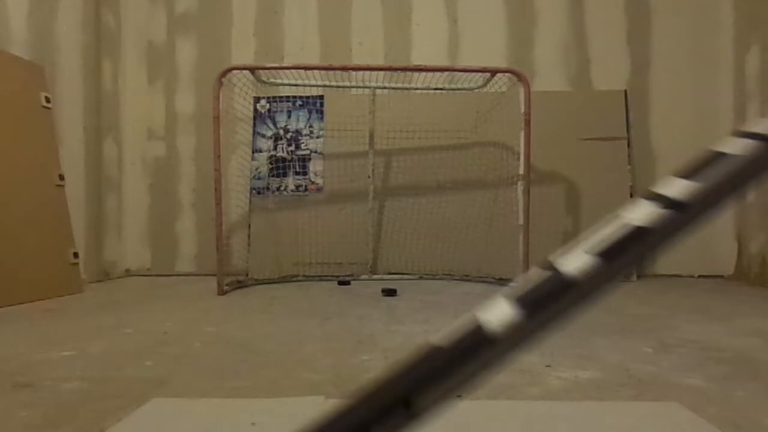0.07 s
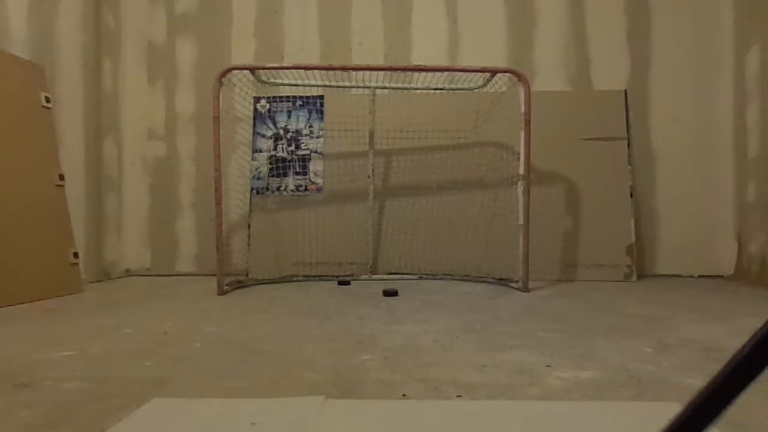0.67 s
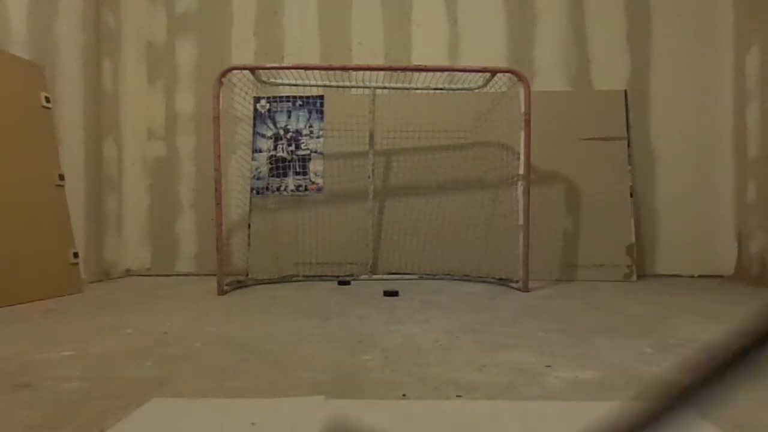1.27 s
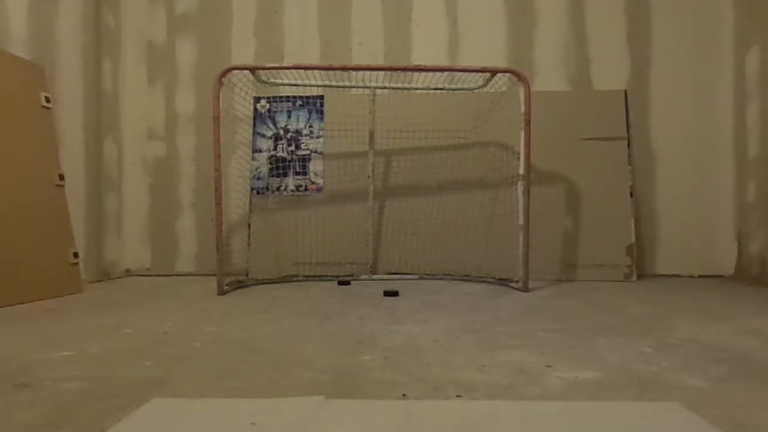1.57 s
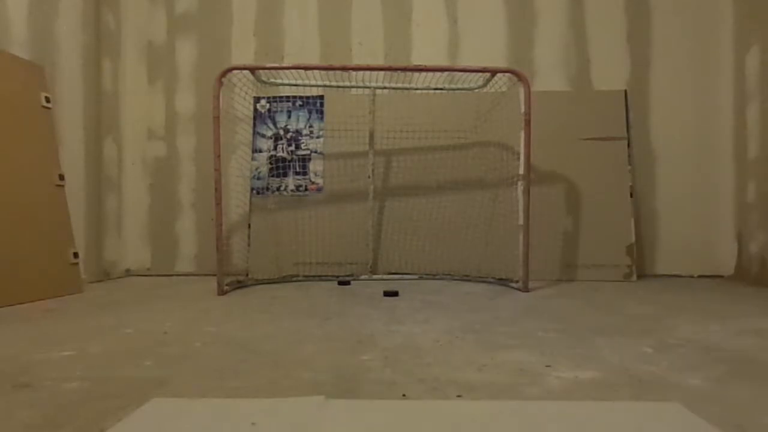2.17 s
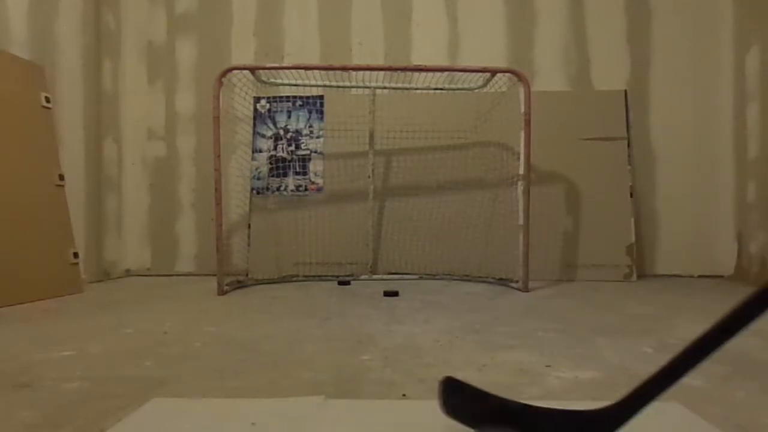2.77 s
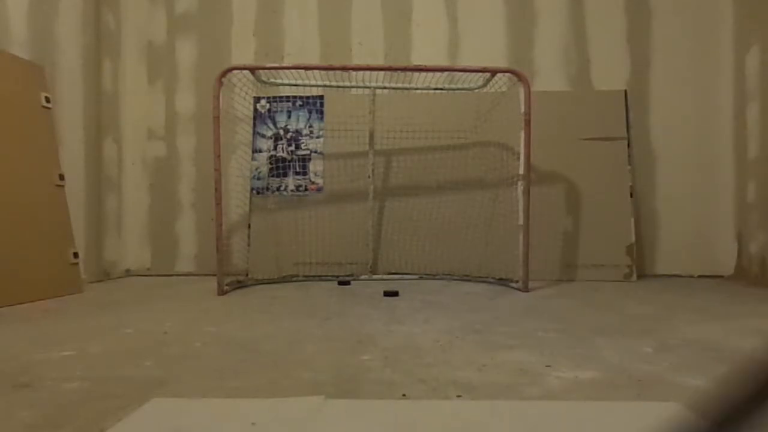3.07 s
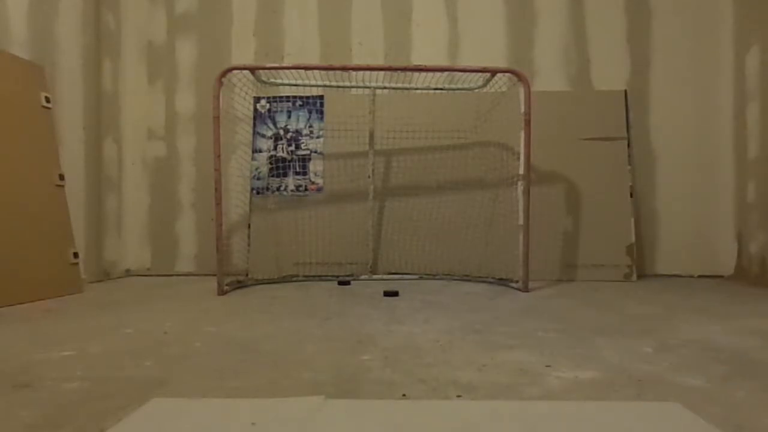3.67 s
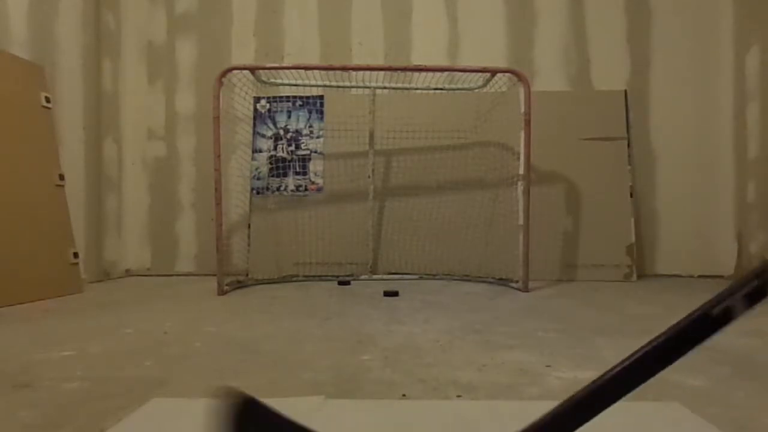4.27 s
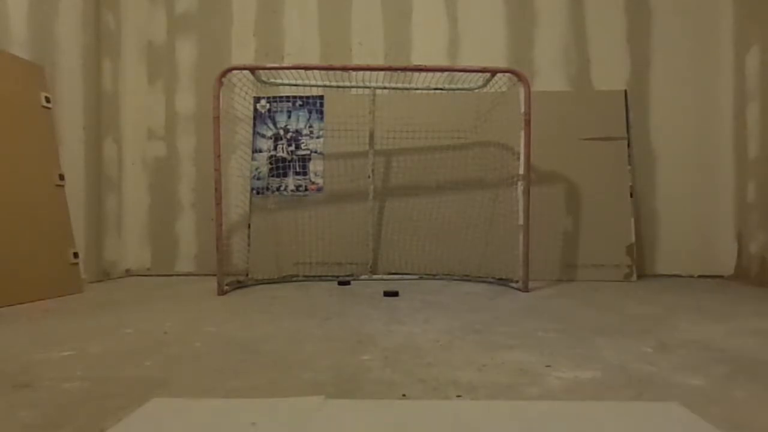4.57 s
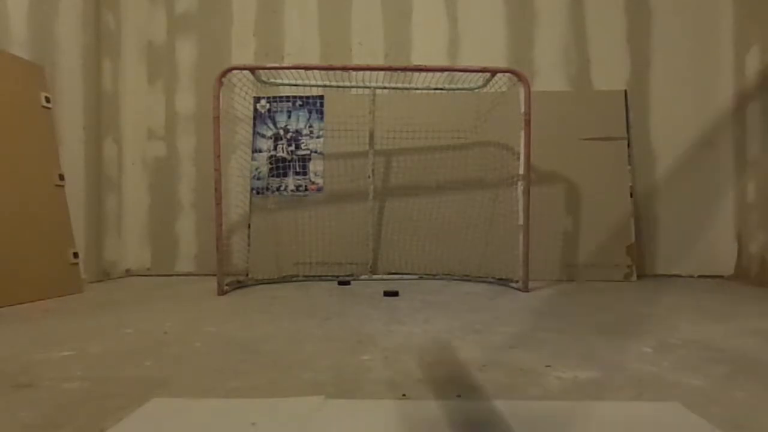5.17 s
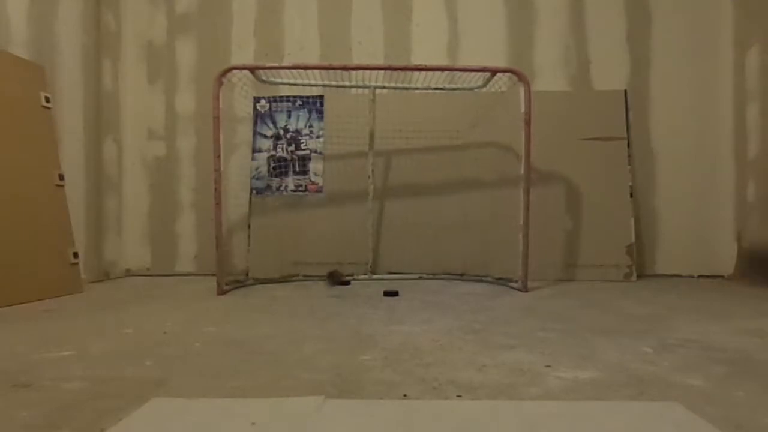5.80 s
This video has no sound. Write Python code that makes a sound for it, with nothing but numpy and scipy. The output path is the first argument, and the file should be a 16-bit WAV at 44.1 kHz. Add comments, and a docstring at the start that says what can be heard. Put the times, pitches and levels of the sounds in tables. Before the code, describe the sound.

A hockey stick handles a puck on a plastic pad close to the microphone, in a bare basement with a low, steady hush and a short, hard echo. A brief grainy rasp at 0.2 seconds leads to a loud knock at 0.4. From 1 to 4.6 seconds the blade clacks the puck to and fro in uneven knocks, often in quick pairs, with soft sliding between them. Two very loud knocks, at 2.8 and 4.1 seconds, overload the microphone with a short bass thump.

After a brief pause, a wrist shot sweeps off the pad at about 5.1 seconds with a scrape and a tight cluster of cracks. At 5.5, across the room, the net swishes, the puck hits a poster hanging in it with loud, bright slaps, and the steel frame rings briefly. Around 5.75 the puck thuds onto the concrete as the net rustles out.

```python
"""Stickhandling in a hushed, bare basement. A hockey blade slides over a plastic shooting pad, drags the
puck into place with a rasp and knocks it to and fro; hard walls answer every knock, and two very loud
ones overload the microphone with a short bass thump. Then a wrist shot sweeps off the pad. The goal
net swishes as it stretches, the puck slaps a poster hung in it and the jerk rings the steel frame.
Last, the puck thuds onto the concrete while the net sways and rustles out."""
import sys
import numpy as np
from scipy import signal
from scipy.fft import rfft, irfft, next_fast_len
from scipy.io import wavfile

SR = 44100
rng = np.random.default_rng(int(sys.argv[2]) if len(sys.argv) > 2 else 0)


def inscribe(sig):
    """Save sig as 16-bit PCM at rate SR to the path in sys.argv[1].

    A 1-D sig is mono; a 2-D sig holds one channel per row.
    Samples are clipped to [-1, 1] before scaling.
    """
    pcm = np.round(np.clip(np.atleast_2d(sig).T, -1, 1) * 32767)
    wavfile.write(sys.argv[1], SR, pcm.astype(np.int16))


N = 261954
TIME = np.arange(N) / SR

# rubbing gestures: (up to speed [s], slows down [s], level [dB])
SLIDE_STROKES = [(.08, .1, -44.5), (.16, .55, -41.5), (.62, .76, -47.5), (.8, .82, -46), (1.08, 1.16, -41),
                 (1.24, 1.36, -46.5), (1.52, 1.97, -41.5), (2.19, 2.33, -43), (2.48, 2.56, -39),
                 (2.62, 2.78, -42.5), (2.9, 3.21, -43), (3.765, 4.33, -40.5), (4.38, 4.57, -46)]  # blade and puck travel over the pad
RASP_STROKES = [(.185, .25, -32.5)]
SHOT_STROKES = [(5.03, 5.09, -28), (5.115, 5.22, -25.5)]
NET_SWAYS = [(5.58, 5.66, -29.5), (5.745, 5.76, -29), (5.86, 5.88, -37.5)]

# hits: (time [s], strength [dB], extra body [dB], extra crack [dB], ring of the struck spot [Hz],
# that ring's boost [dB], direct sound aimed at the microphone [dB])
BLADE_HITS = [(0.4458, 30, -6, -9, 1320, 0, 2), (0.9865, 19, 6, 2, 1240, 2.5, -0.5),
              (1.0373, 23.5, 3, -16.5, 820, 5, 2.5), (1.3255, 9, 9, -1, 605, 7, -1.5),
              (1.5224, 18, 2, -13.5, 690, 4, 3), (1.804, 21, -10, -4.5, 1105, 5, -0.5),
              (1.843, 26.5, -2, -14.5, 826, 5.5, 2), (2.038, 9, 5, 10.5, 2630, 4, 1.5),
              (2.0975, 3.5, 1.5, 10.5, 3550, 12, 7), (2.185, 11, 3, 8.5, 2130, 2.5, 0),
              (2.345, 4.5, 10.5, -4.5, 700, 7, 3), (2.701, 10.5, 7, 9, 4800, 3.5, 1.5),
              (2.779, 33, -8.5, -9, 1160, 5, 1.5), (3.028, 6.5, 7, 12, 4300, 1.5, 0.5),
              (3.101, 5, -7, 7.5, 2280, 6.5, 3.5), (3.136, 11, 6, 0, 1270, 4.5, 2),
              (3.862, -18.5, -2, 18, 2100, 15, 7.5), (3.955, 19, -2.5, -5.5, 4400, 10.5, 5),
              (4.083, 28, -3, -11.5, 665, 5.5, 1), (4.292, 3, 4, 5, 2560, 6.5, 4),
              (4.341, 2, 6.5, 9.5, 1950, 5.5, 0), (4.594, 5, 6.5, -16, 1265, 1.5, 6),
              (5.104, 13, 2, 8.5, 1560, 5, -1.5), (5.1205, 19.5, 8.5, 7, 610, 10.5, 1.5),
              (5.1245, 22, -34, -11, 655, 8, -3), (5.135, 14, 8, 9.5, 660, 14, -1.5),
              (5.1585, -4.5, 3, 29.5, 4360, 2.5, 5.5)]
POSTER_HITS = [(5.479, 26.2, 3.5, -8.8, 1210, 5.4, 3.3), (5.489, 21.7, -4, 2.4, 2650, 13.7, 3.9),
               (5.523, 13, -5, 0, 2650, 7.3, 4.8), (5.561, 17.3, -12, -1, 2650, 6.8, 5)]
FLOOR_HITS = [(5.747, 18.2, 3.5, 9.5, 392, 4.4, 0), (5.7605, 18.3, 5, -13, 520, 10.7, 1.8),
              (5.771, 21, -2.5, -5, 550, 8.2, 0), (5.786, 19.8, -13, 2, 520, 5.1, 2)]
# bass thumps as two very loud knocks overload the microphone: (time [s], peak [dB])
OVERLOAD_THUMPS = [(2.778, -28.5), (4.084, -29)]

# tone of each layer: (frequency [Hz], level [dB])
HUSH_EQ = [(20, -34), (50, -16.5), (110, -9), (260, -13.5), (460, -12.5), (1600, -17.5), (2300, -16),
           (3000, -26), (8500, -30.5), (15000, -27)]
SLIDE_EQ = [(59, -45), (100, -14), (146, -16.5), (324, -6.5), (416, -13), (607, -5.5), (780, -11),
            (1920, -1), (2130, -2.5), (4730, -3), (13500, -18), (15000, -27)]
RASP_EQ = [(60, -53), (400, -23), (950, -12.5), (1200, -5), (1600, -20), (2120, -8), (2700, -19),
           (8000, -33)]
KNOCK_EQ = [(55, -38.5), (130, -23.5), (270, -11), (780, -1), (1700, -3.5), (4100, -10.5), (10000, -25),
            (15000, -36.5)]
SHOT_EQ = [(59, -77), (100, -34), (196, -22), (558, -6), (633, -5.5), (923, -10), (1240, -2), (1320, -1),
           (4260, -8.5), (15000, -24)]
POSTER_EQ = [(29, -41), (50, -24), (181, -16.5), (220, -11.5), (354, -7), (506, -9.5), (816, -8),
             (1310, -2.5), (2070, -10), (2570, -10), (3180, -9), (13000, -24), (15000, -38)]
MESH_EQ = [(3000, -29), (6000, -11), (9000, -4), (12500, 1), (15000, -6.5)]
SLAP_EQ = [(55, -26), (270, -14.5), (780, -1), (1700, -0.5), (4100, -2.5), (10000, -20.5), (15000, -24)]
DROP_EQ = [(55, -21.5), (270, -2), (780, 0.5), (1700, -5.5), (4100, -21.5), (10000, -38), (15000, -46)]

# resonances of the blade: (frequency [Hz], width [Hz], boost [dB])
BLADE_PEAKS = [(867, 194, 0.5), (1320, 93, 4), (2650, 35, 3)]
# things that ring on after a blow: (frequency [Hz], level [dB], t60 [s])
PANEL_MODES = [(229, -63, 0.98), (461, -52, 0.91), (520, -47, 0.46), (609.3, -53.5, 0.74), (655, -53, 0.52),
               (842, -43, 0.18), (907, -51, 0.82), (1030, -58, 0.5), (1160, -54.5, 0.98)]  # boards and panels in the room
FRAME_MODES = [(1305, -26, 0.79), (1720, -40, 0.52), (2670, -30, 0.33)]  # steel goal frame

# early reflections off floor and walls: (delay [s], gain [linear])
REFLECTIONS = [(.0016, .16), (.0047, .56), (.0062, -.2), (.0212, .22), (.0255, .38), (.032, .22)]
# tone of the reverb tail: (frequency [Hz], level [dB])
REVERB_EQ = [(60, 9), (130, 6.5), (250, 4.5), (600, 5), (1200, 5), (2500, 6.5), (5000, 4.5), (12000, 3)]
# length of the reverb tail: (frequency [Hz], t60 [s])
REVERB_T60 = [(100, 0.64), (500, 0.64), (1200, 0.74), (3000, 0.6), (6000, 0.53), (13000, 0.31)]
# stereo width: (frequency [Hz], side against mid [dB])
SIDE_EQ = [(40, -19), (130, -25), (500, -39.5), (1000, -41.5), (2000, -41), (4000, -38), (9000, -28)]

BODY_HZ, MIDDLE_HZ, CRACK_HZ = 270, 842, 6000  # a hit's extra body fades out, then extra crack fades in
TOUCH_S, JERK_S = 5.378, 5.487  # the puck meets the net; the net jerks taut


def from_db(db):
    """Decibels to gain."""
    return 10 ** (np.asarray(db) / 20)


def rms_one(x):
    """Scale to unit power."""
    return x / np.sqrt(np.mean(x ** 2) + 1e-20)


def at_hz(points, hz):
    """Read a curve on a log-frequency axis."""
    f, value = np.transpose(points)
    return np.interp(np.log(np.maximum(hz, 1)), np.log(f), value)


def colour(x, eq):
    """Shape a sound with an EQ curve."""
    size = next_fast_len(len(x) + SR // 10)
    gain = from_db(at_hz(eq, np.fft.rfftfreq(size, 1 / SR)))
    return irfft(rfft(x, size) * gain, size)[:len(x)]


def causal_pulse(db):
    """The tightest click with this spectrum that starts at once (minimum phase)."""
    cepstrum = irfft(np.log(from_db(db)))
    half = len(cepstrum) // 2
    cepstrum[1:half] *= 2
    cepstrum[half + 1:] = 0
    return irfft(np.exp(rfft(cepstrum)))


def ring(modes, t):
    """Damped sines, silent before t = 0."""
    t = np.maximum(t, 0)
    return sum(from_db(db - 60 * t / t60) * np.sin(2 * np.pi * hz * t) for hz, db, t60 in modes)


def grains(per_s, spread_db, hiss, grain_s=0.0012):
    """Friction texture: tiny random slips of uneven size, each a burst of noise, over a smooth hiss."""
    sizes = from_db(spread_db * np.minimum(rng.exponential(1, N), 3))
    slips = sizes * (rng.random(N) < per_s / SR)
    power = signal.lfilter([1], [1, -np.exp(-1 / (grain_s * SR))], slips ** 2 + 1e-18)
    return rms_one(np.sqrt(power / power.mean() + hiss ** 2) * rng.standard_normal(N))


def strokes(rows, rise_db_per_s, sag_db_per_s, fall_db_per_s):
    """Envelope of rubbing gestures: each swells, sags while it lasts and dies away."""
    gains = [from_db(db - rise_db_per_s * np.maximum(start - TIME, 0)
                     - sag_db_per_s * np.maximum(TIME - start, 0)
                     - fall_db_per_s * np.maximum(TIME - end, 0)) for start, end, db in rows]
    return np.max(gains, axis=0)


def room_hush(level_db=-56):
    """The room tone: a steady bed of dark noise."""
    return from_db(level_db) * rms_one(colour(rng.standard_normal(N), HUSH_EQ))


def basement(direct_db, wet_db, build_s=0.017, band_count=13, size=32768):
    """Echoes from one spot: direct sound, reflections, ringing panels, a tail dying band by band."""
    t, hz = TIME[:size], np.fft.rfftfreq(size, 1 / SR)
    centres = np.geomspace(60, 15000, band_count)
    shares = np.array([at_hz(np.c_[centres, one], hz) for one in np.eye(band_count)])
    bands = irfft(rfft(rng.standard_normal(size)) * shares * from_db(at_hz(REVERB_EQ, hz)))
    thicken = 1 - np.exp(-t / build_s)
    fade = thicken * from_db(-60 * t / at_hz(REVERB_T60, centres)[:, None])
    tail = np.sum(bands * fade / np.linalg.norm(fade, axis=1, keepdims=True), axis=0)
    early = np.zeros(size)
    for delay, gain in REFLECTIONS:
        early[int(delay * SR)] += gain
    early = signal.lfilter(*signal.butter(1, 2800, fs=SR), early + 1e-18)  # rough walls scatter treble
    early[0] += 1  # direct sound
    return from_db(direct_db) * early + from_db(wet_db) * (tail + ring(PANEL_MODES, t))


def near(aim_db=0):
    """Close perspective: the pad, just in front of the microphone."""
    return basement(direct_db=-1.0 + aim_db, wet_db=-2.5)


def far(aim_db=0):
    """Distant perspective: the goal, across the room."""
    return basement(direct_db=-2.5 + aim_db, wet_db=-6.0)


def blade_slide(wobbles_per_s=54, wobble_db=1.0):
    """Blade and puck rub over the plastic pad under uneven pressure."""
    slips = grains(per_s=380, spread_db=9, hiss=0.88)
    steps = rng.standard_normal(2000)
    pressure = from_db(wobble_db * np.interp(TIME * wobbles_per_s, np.arange(len(steps)), steps))
    envelope = strokes(SLIDE_STROKES, rise_db_per_s=161.5, sag_db_per_s=6, fall_db_per_s=216)
    return envelope * rms_one(colour(slips * pressure, SLIDE_EQ))


def puck_rasp():
    """A short, grainy scrape as the puck is dragged into place."""
    slips = grains(per_s=250, spread_db=7.5, hiss=0.33)
    envelope = strokes(RASP_STROKES, rise_db_per_s=1500, sag_db_per_s=101, fall_db_per_s=996)
    return envelope * rms_one(colour(slips, RASP_EQ))


def impacts(rows, eq, room, ring_width_share, crossover_hz, grit, grit_s, resonances=(), size=2048):
    """Each hit is a soft push plus a gritty crack, with the ring and the echoes of its own spot."""
    hz, t = np.fft.rfftfreq(size, 1 / SR), TIME[:size]
    push = signal.lfilter(*signal.butter(1, crossover_hz, fs=SR), t == 0)
    highpass = signal.butter(2, crossover_hz, "high", fs=SR)
    lows = at_hz([(BODY_HZ, 1), (MIDDLE_HZ, 0)], hz)
    highs = at_hz([(MIDDLE_HZ, 0), (CRACK_HZ, 1)], hz)
    out = np.zeros(N + SR)
    for time_s, strength_db, body_db, crack_db, ring_hz, ring_db, aim_db in rows:
        peaks = [*resonances, (ring_hz, ring_width_share * ring_hz, ring_db)]
        peaks_db = sum(db / (1 + (2 * (hz - f) / width) ** 2) for f, width, db in peaks)
        tone_db = at_hz(eq, hz) + strength_db + body_db * lows + crack_db * highs
        burst = rng.standard_normal(size) * np.sqrt(t) * np.exp(-t / grit_s)
        crack = signal.lfilter(*highpass, burst)
        force = push + grit * crack / np.linalg.norm(crack)
        # cancel most of the grit's ripple: it smears the attack but barely colours it
        ripple_db = 0.7 * 10 * np.log10(np.abs(rfft(force)) ** 2 + 0.1)
        blow = signal.fftconvolve(force, causal_pulse(tone_db + peaks_db - ripple_db))[:size]
        heard = signal.fftconvolve(blow, room(aim_db))
        start = int(time_s * SR)
        out[start:start + len(heard)] -= heard
    return out[:N]


def blade_knocks():
    """The heavily damped blade clacks against puck and pad."""
    return impacts(BLADE_HITS, KNOCK_EQ, near, ring_width_share=0.3, crossover_hz=2560,
                   grit=2.36, grit_s=0.002, resonances=BLADE_PEAKS)


def overload_thumps(rise_s=0.00081):
    """A short, one-sided bass thump on each of two very loud knocks that overload the microphone."""
    ages = [(np.maximum(TIME - time_s, 0) / rise_s, db) for time_s, db in OVERLOAD_THUMPS]
    return -sum(from_db(db) * age * np.exp(1 - age) for age, db in ages)


def shot_sweep():
    """The wrist shot: the blade draws the puck along the pad, then leans into it."""
    slips = grains(per_s=510, spread_db=3.5, hiss=0.39)
    envelope = strokes(SHOT_STROKES, rise_db_per_s=272, sag_db_per_s=75, fall_db_per_s=400)
    return envelope * rms_one(colour(slips, SHOT_EQ))


def net_stretch(peak_db, rise_db_per_s):
    """Envelope of the net: it swells with tension from touch to jerk, then collapses as it goes slack."""
    swell = strokes([(JERK_S, JERK_S, peak_db)], rise_db_per_s, sag_db_per_s=0, fall_db_per_s=600)
    return (TIME > TOUCH_S) * swell


def net_rustle(mesh_sway_db=-9.5):
    """The poster crumples and the mesh swishes as the net stretches, and again as it swings on."""
    sway = strokes(NET_SWAYS, rise_db_per_s=400, sag_db_per_s=17, fall_db_per_s=252)
    crumple = net_stretch(peak_db=-9.5, rise_db_per_s=213) + sway
    swish = net_stretch(peak_db=-24.5, rise_db_per_s=92) + from_db(mesh_sway_db) * sway
    poster = rms_one(colour(grains(per_s=980, spread_db=3.0, hiss=0.57), POSTER_EQ))
    mesh = rms_one(colour(grains(per_s=770, spread_db=7, hiss=0.63), MESH_EQ))
    return crumple * poster + swish * mesh


def poster_slaps():
    """The puck crashes into the poster in a flurry of hard, bright slaps."""
    return impacts(POSTER_HITS, SLAP_EQ, far, ring_width_share=0.077, crossover_hz=880,
                   grit=0.91, grit_s=0.0056)


def frame_ring():
    """The jerk of the net sets the steel frame ringing."""
    return ring(FRAME_MODES, TIME - JERK_S)


def puck_drop():
    """The puck lands on the concrete under the net in a tight cluster of dull thuds."""
    return impacts(FLOOR_HITS, DROP_EQ, far, ring_width_share=0.53, crossover_hz=1790,
                   grit=1.0, grit_s=0.012)


def scene():
    """Stick up close, goal far off, hush beneath; a faint, smeared side signal gives a near-mono image."""
    stick = blade_knocks() + overload_thumps()
    friction = blade_slide() + puck_rasp() + shot_sweep()
    stick += signal.fftconvolve(friction, near())[:N]
    rustle = net_rustle()
    goal = poster_slaps() + frame_ring() + puck_drop()
    goal += signal.fftconvolve(rustle, far())[:N]
    mid = stick + goal + room_hush()
    scatter = rng.standard_normal(SR // 50) * np.exp(-TIME[:SR // 50] / 0.0018)
    smeared = signal.fftconvolve(mid, scatter / np.linalg.norm(scatter))[:N]
    side = colour(smeared, SIDE_EQ)
    return np.array([mid + side, mid - side])


def record(dry, cutoff_hz=15200):
    """The loudest peaks overload and flatten at full scale; a steep low-pass takes off the top."""
    clipped = dry / (1 + dry ** 8) ** (1 / 8)
    lowpass = signal.ellip(10, 0.1, 70, cutoff_hz, fs=SR, output="sos")
    return signal.sosfilt(lowpass, clipped)


dry = scene()
out = record(dry)
inscribe(out)
```